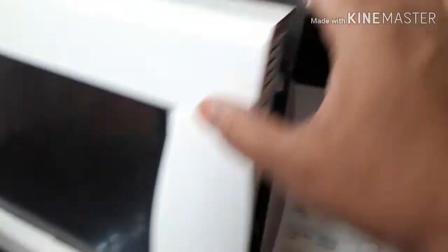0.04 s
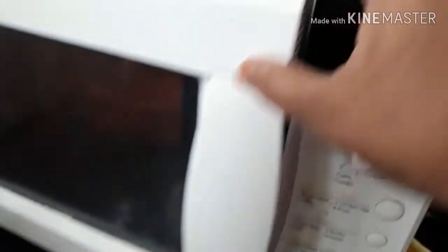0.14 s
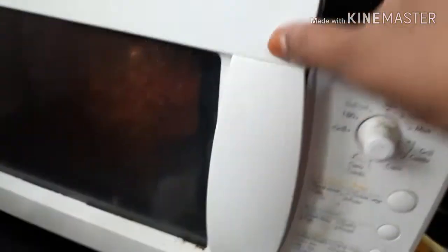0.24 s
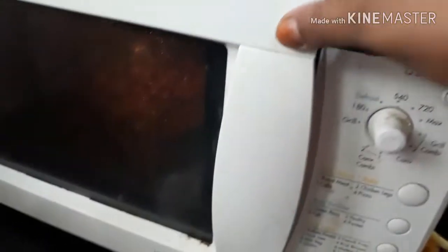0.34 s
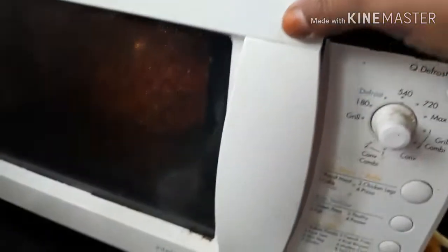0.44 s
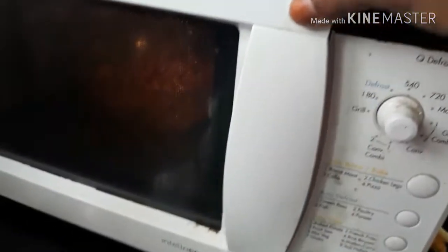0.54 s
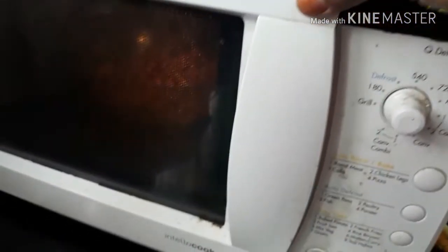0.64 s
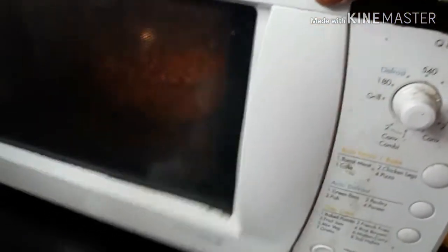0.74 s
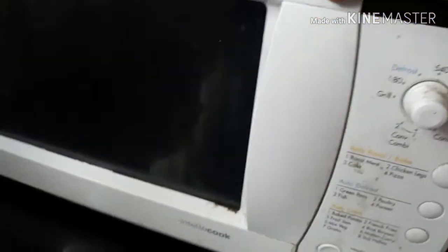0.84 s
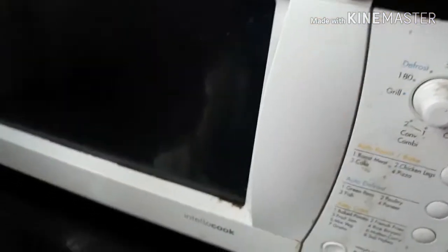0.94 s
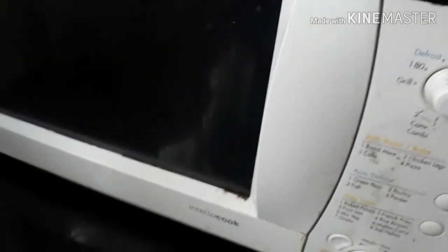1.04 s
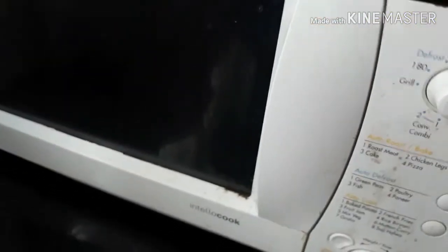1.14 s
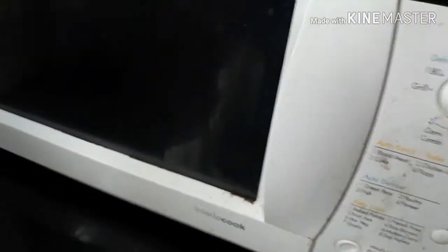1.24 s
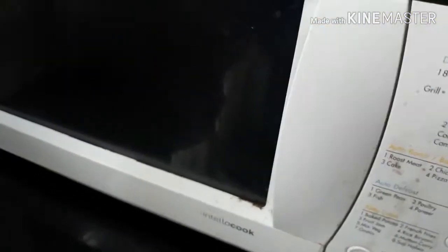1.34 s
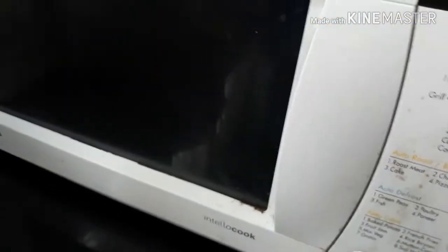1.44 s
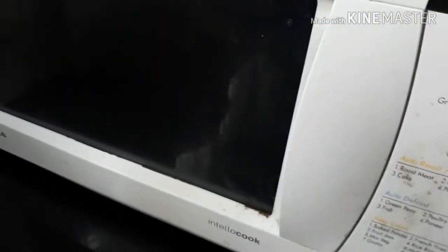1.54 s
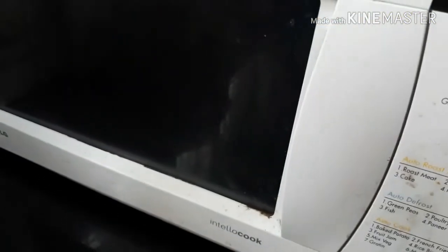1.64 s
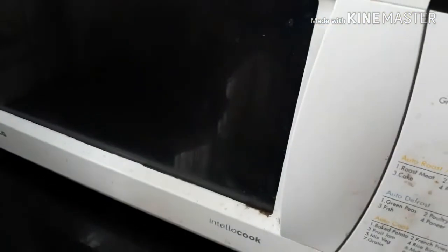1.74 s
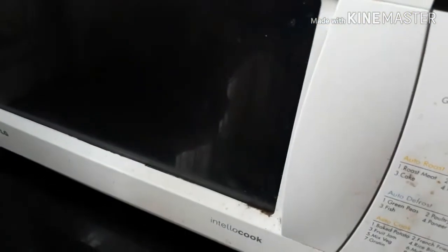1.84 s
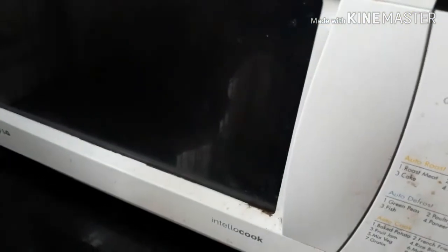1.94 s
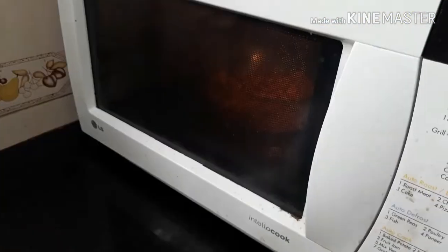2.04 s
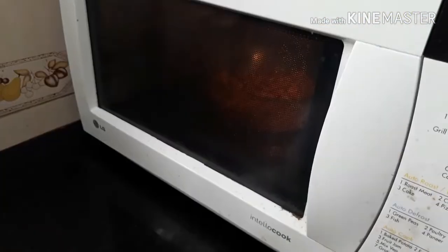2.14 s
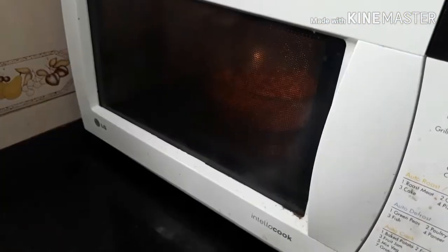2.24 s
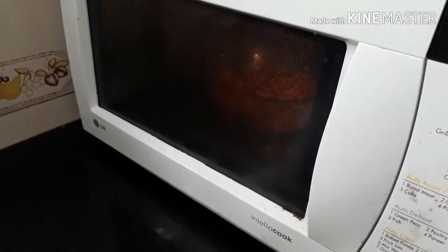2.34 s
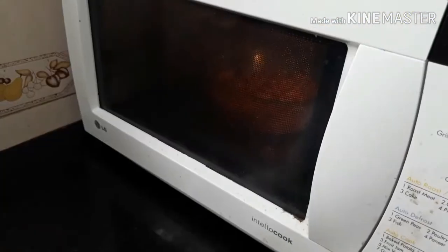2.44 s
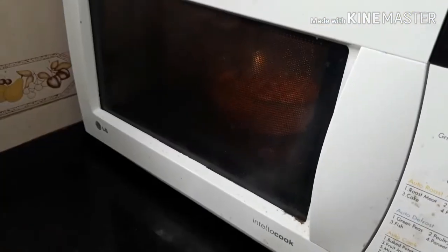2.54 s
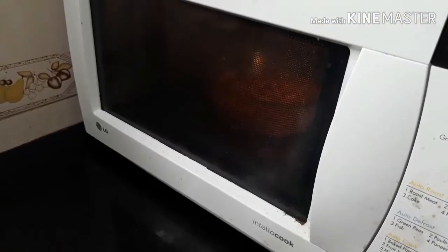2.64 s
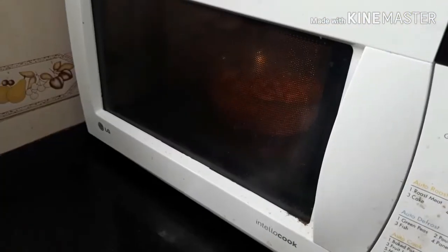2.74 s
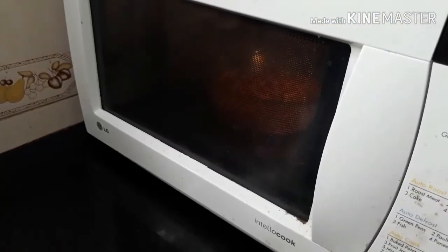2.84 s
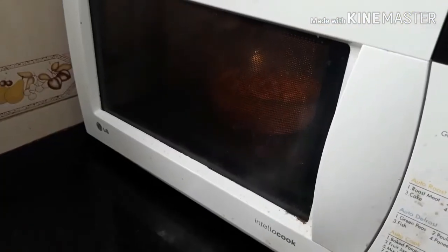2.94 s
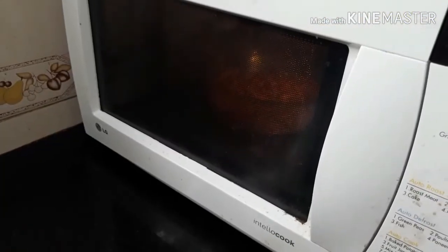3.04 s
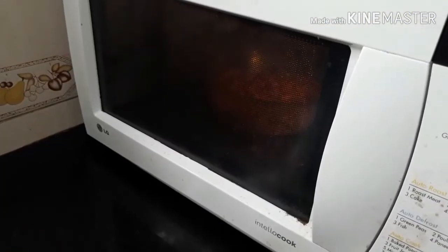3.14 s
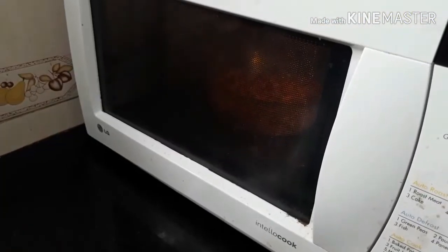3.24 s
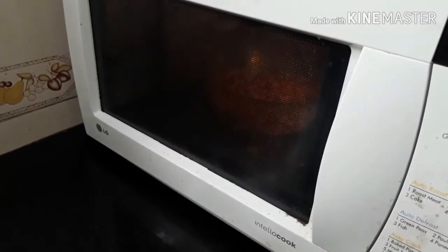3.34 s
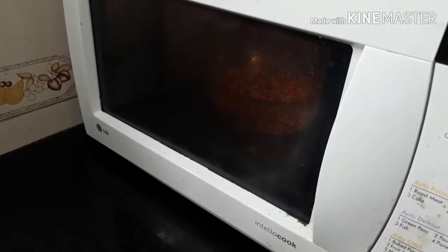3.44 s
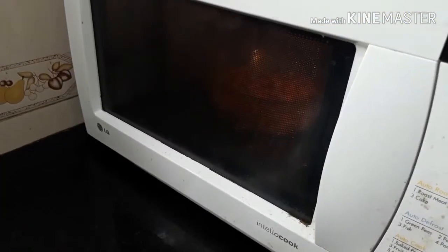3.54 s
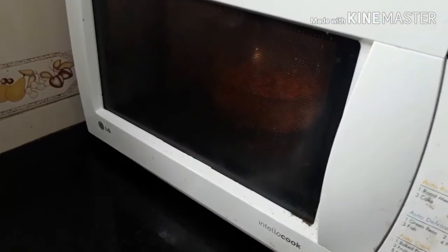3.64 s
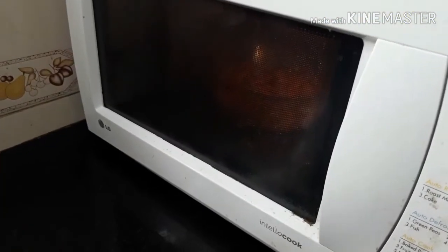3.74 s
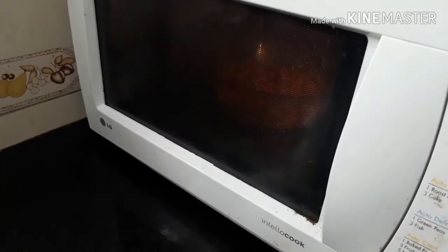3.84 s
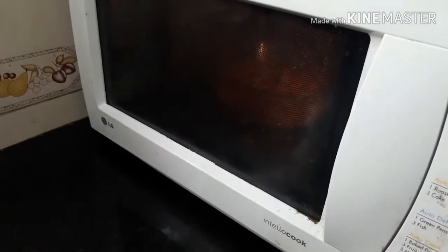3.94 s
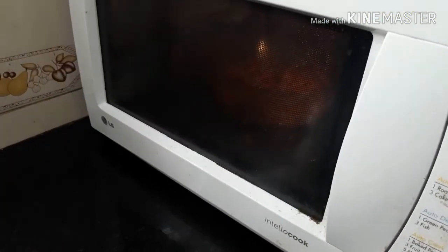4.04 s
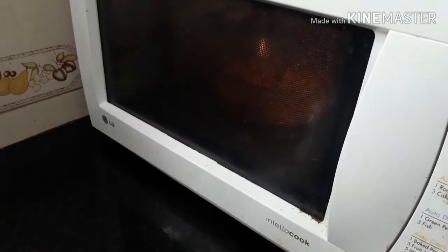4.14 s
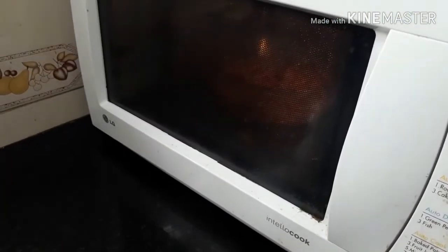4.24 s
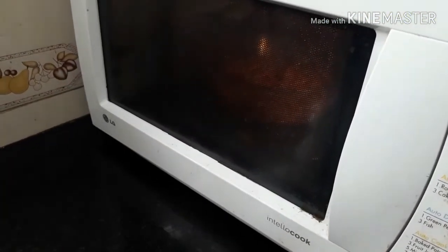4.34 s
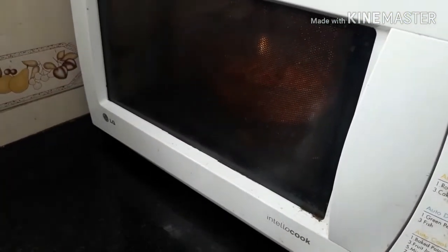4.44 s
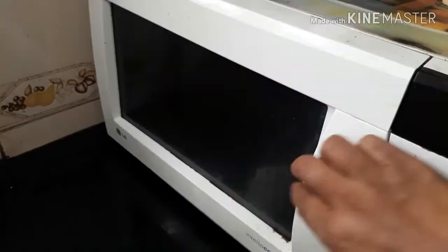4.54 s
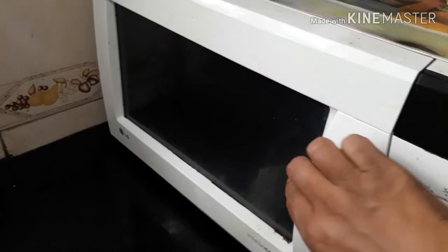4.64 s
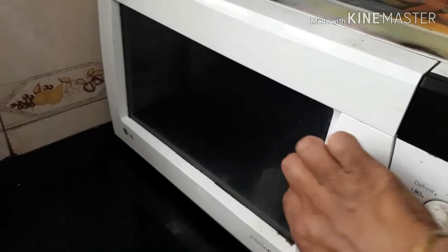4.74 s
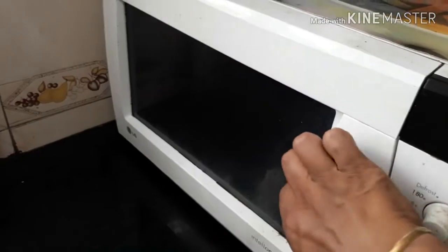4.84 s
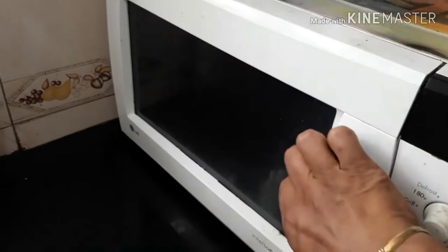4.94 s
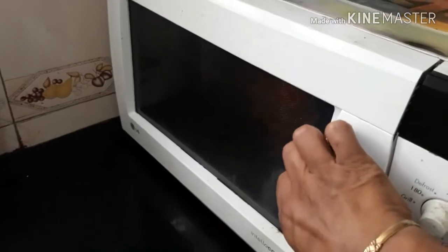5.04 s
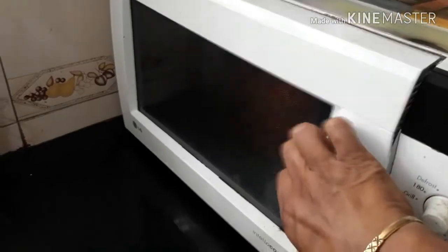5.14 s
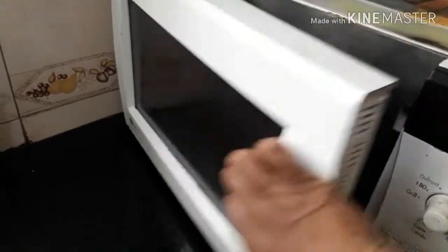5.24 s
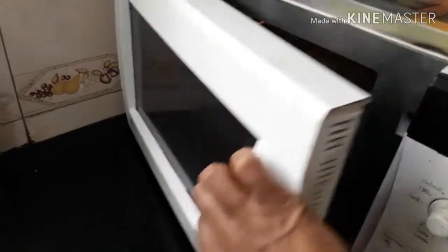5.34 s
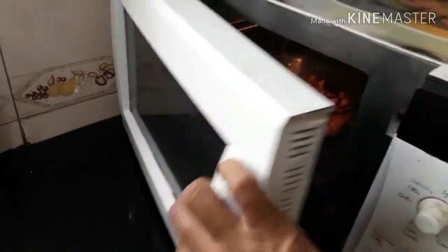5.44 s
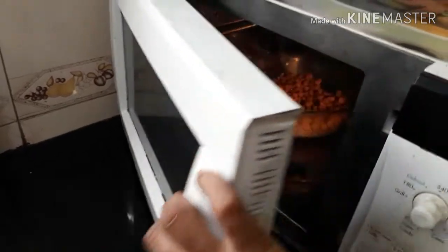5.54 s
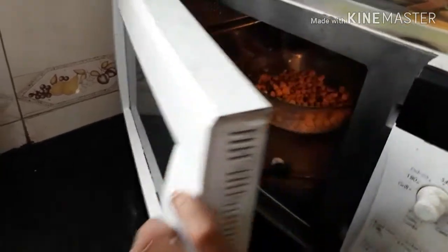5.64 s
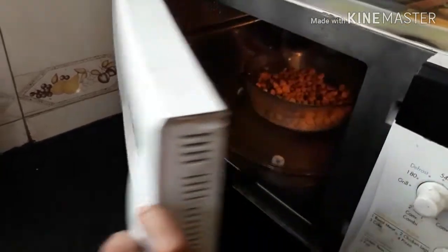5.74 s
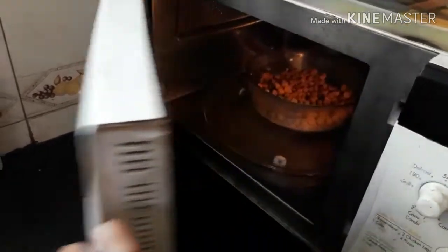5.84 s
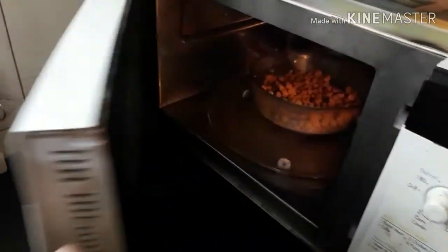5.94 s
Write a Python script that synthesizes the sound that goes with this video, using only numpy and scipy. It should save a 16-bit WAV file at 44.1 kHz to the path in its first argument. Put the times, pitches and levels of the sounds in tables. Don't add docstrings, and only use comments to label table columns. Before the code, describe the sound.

Bright latch ticks and a hollow door slam, a brief gap, a low electrical hum with fan air, then a clicking door release.

```python
import sys
import numpy as np
from scipy import signal
from scipy.fft import rfft, irfft, next_fast_len
from scipy.io import wavfile

SR = 44100
rng = np.random.default_rng(int(sys.argv[2]) if len(sys.argv) > 2 else 0)


def level_to_linear(level):
    exponent = np.asarray(level, float) / 20
    return 10 ** exponent


def wav_out(sig):
    wavfile.write(sys.argv[1], SR, np.round(np.clip(np.atleast_2d(sig).T, -1, 1) * 32767).astype(np.int16))


N = 264159


def in_time(rows):
    s, *columns = np.transpose(rows)
    return [np.interp(np.arange(N) / SR, s, c) for c in columns]


def at_hz(points, hz):
    table_hz, values = np.transpose(points)
    return np.interp(np.log(np.maximum(hz, 1)), np.log(table_hz), values)


def rms_one(x):
    return x / np.sqrt(np.mean(x ** 2) + 1e-20)


def drift(rate):
    r = np.exp(-80 * np.pi * rate / SR)
    white = rng.standard_normal(N // 40 + 2002)
    slow = signal.lfilter([1], [1, -2 * r, r * r], white)[2000:]
    return np.interp(np.arange(N) / 40, np.arange(len(slow)), rms_one(slow))


def noise(spectrum, peaks=()):
    size = next_fast_len(N)
    hz = np.arange(size // 2 + 1) * SR / size
    level_db = at_hz(spectrum, hz)
    for top_hz, width, db in peaks:
        level_db = level_db + db / (1 + ((hz - top_hz) / width) ** 2)
    return rms_one(irfft(rfft(rng.standard_normal(size)) * level_to_linear(level_db), size)[:N])


def causal(level_db):
    cepstrum = irfft(level_db * np.log(10) / 20)
    half = len(cepstrum) // 2
    folded = np.r_[cepstrum[0], 2 * cepstrum[1:half], cepstrum[half], np.zeros(half - 1)]
    pulse = irfft(np.exp(rfft(folded)))[:half]
    return pulse / np.sqrt(np.sum(pulse ** 2))


def ring(force, hz, t60):
    r, w = level_to_linear(-60 / (t60 * SR)), 2 * np.pi * hz / SR
    return signal.lfilter([0, np.sin(w)], [1, -2 * r * np.cos(w), r * r], force + 1e-18)


def rattle(t60, uneven_db, rise, size=8820):
    t = np.arange(size) / SR
    lumps_db = uneven_db * np.repeat(rng.standard_normal(size // 42), 42)
    grains = rng.standard_normal(size) * level_to_linear(lumps_db)
    return grains * level_to_linear(-60 * t / t60) * np.minimum(t / rise, 1)


def add(out, s, x):
    i = round(s * SR)
    out[i:i + len(x)] += x[:N - i]


# rumble, air, rustle and hiss in dB.
REST = [
    (-58, -60, -68.5, -78),
    (-55.5, -47, -49, -59.5),
]
# time in seconds, dB over rest.
STIR = [(0, -1.5), (.22, 4.2), (.4, 11), (.6, 2), (.72, 11), (1.2, 6), (1.6, 3.5), (1.95, 5.5), (4.7, -3.7),
        (4.9, 3), (5.1, 13.5), (5.18, 9), (5.4, 16.5), (5.63, 4.5), (5.82, 4), (5.89, 3), (5.99, 8)]
# time in seconds, hiss in dB over rest, half length in seconds.
BRUSHES = [
    (.22, 9, .1),
    (5.575, 1.5, .06),
    (5.728, 10, .07),
    (5.94, 9, 0.067),
]
# frequency in Hz, density in dB per Hz.
RUMBLE = [(30, -32.5), (60, -13.5), (85, -2), (106, 3), (135, -13.5), (200, 0.5), (300, -12), (400, -62)]
RUMBLE_OPEN = [(30, -42), (70, -6.5), (125, -7.5), (160, 0.5), (270, 0), (370, -9.5), (450, -35.5)]
AIR = [(200, -28.5), (350, 3.5), (800, -2), (1500, -5), (2500, -7.5), (3100, -13), (4000, -11),
       (4800, -24.5), (5800, -27.5)]
RUSTLE = [(3500, -8), (5000, -7), (5800, -4), (6900, -2.5), (8600, -10.5), (9300, -32.5)]
HISS = [(8000, -26.5), (9200, -4), (11000, -1.5), (13000, -14.5), (15000, -12.5), (16000, -1.5)]


def still_kitchen():
    t = np.arange(N) / SR
    rumble_db, air_db, rustle_db, hiss_db = np.array(REST).T[:, (t > 2) * 1]
    stir_db, = in_time(STIR)
    brush_db = sum(db * np.exp(-((t - s) / half) ** 2) for s, db, half in BRUSHES)
    air_db = air_db + 0.25 * stir_db + 0.14 * brush_db
    rustle_db = rustle_db + 0.1 * stir_db + 0.42 * brush_db
    rumble = level_to_linear(rumble_db + stir_db + 1.2 * drift(6)) * np.where(t < 2, noise(RUMBLE), noise(RUMBLE_OPEN))
    air = level_to_linear(air_db + 0.6 * drift(21)) * noise(AIR)
    rustle = level_to_linear(rustle_db + 1.4 * drift(12)) * noise(RUSTLE)
    hiss = level_to_linear(hiss_db + brush_db + 0.6 * drift(12)) * noise(HISS)
    return (rumble + air + rustle + hiss) * ((t < 2) | (t > 4.58))


def thumps(pushes, notes):
    out, t = np.zeros(N), np.arange(SR) / SR
    rise_cycles = 1.97
    for hz, note_db, t60 in notes:
        swell = 1 - np.exp(-t * hz / rise_cycles)
        fade = np.cos(np.pi / 2 * t) ** 2
        note = level_to_linear(note_db - 60 * t / t60) * swell * np.sin(2 * np.pi * hz * t) * fade
        for s, push_db, pitch_hz, fall_db in pushes:
            octaves_away = abs(np.log2(hz / pitch_hz))
            add(out, s, level_to_linear(push_db - fall_db * octaves_away) * note)
    return out * level_to_linear(1.5 * drift(9))


# frequency in Hz, density in dB per Hz.
CRACK = [(120, -11), (200, -9), (353, 2), (519, -5), (1530, -11.5), (1810, -14), (7270, -22.5),
         (9580, -30.5), (14600, -42), (16000, -43)]


def blows(table, modes):
    cracks, rings, hz = np.zeros(N), np.zeros(N), np.linspace(0, SR / 2, 513)
    for s, crack_db, t60, tilt_db, door_db in table:
        shake = rattle(t60, uneven_db=3.0, rise=.002)
        colour = causal(at_hz(CRACK, hz) + tilt_db * np.log2((hz + 100) / 2000))
        add(cracks, s, level_to_linear(crack_db - 2.0) * np.convolve(shake, colour))
        push = np.r_[np.hanning(24) / 12, np.zeros(SR // 2)]
        add(push, 0, level_to_linear(-24.5) * shake)
        strengths = level_to_linear(door_db - 4 + 2.5 * rng.standard_normal(len(modes)))
        strengths = strengths * rng.choice([-1, 1], len(modes))
        panel = sum(strength * level_to_linear(db) * ring(push, mode_hz, mode_t60)
                    for strength, (mode_hz, db, mode_t60) in zip(strengths, modes))
        add(rings, s, panel)
    return np.array([cracks, rings])


def bounces(chatter, t60, tilt_db, count=4):
    return [(s + k * gap, crack_db - k * loss_db, t60, tilt_db, door_db - k * loss_db)
            for s, crack_db, door_db, gap, loss_db in chatter for k in range(count)]


# start in seconds, level in dB, favoured pitch in Hz, fall in dB per octave away.
PUSH_SHUT = [
    (.03, -24.5, 76.6, 40.5),
    (.262, -18.5, 121.3, 59),
    (.264, -12, 191, 26),
    (.335, -25.5, 161, 19),
    (.45, -34.5, 120, 29),
    (.724, -30, 300, 4.5),
    (.745, -22, 199.7, 3.5),
    (.797, 1, 180, -1.8),
    (.97, -18, 166.5, 22),
    (1.438, -37, 104, 25),
]
# frequency in Hz, level in dB, t60 in seconds.
BOX_SHUT = [(80, -26, 0.53), (106.1, -6.5, 0.38), (117, -12.5, .4), (124.2, -8.5, .5), (147, -27, 0.97),
            (172, -16, 0.69), (191, -15.5, .4), (215.7, -26.5, 0.98), (247, -12.5, 0.34), (334, -9, 0.15)]
# start in seconds, crack peak in dB, rattle t60 in seconds,
# brightness in dB per octave, door ring in dB.
SHUT = [
    (.2575, -16.5, 0.075, 2, -20),
    (.53, -37.5, 0.12, 3.5, -40),
    (.7605, -26.5, 0.097, 0.5, -24.5),
    (.7875, -12.5, 0.18, 6, -41),
    (.7985, -13, 0.058, 4.5, -10),
    (.805, -15.5, .04, -7.5, -9.5),
    (.812, -12.5, 0.21, -2.5, -17.5),
]
# first bounce in seconds, crack in dB, door ring in dB, gap in seconds, loss in dB per bounce.
CHATTER_SHUT = [
    (.283, -29, -28.5, .0275, 1.5),
    (.826, -18.5, -12.5, .031, 4.5),
]
# frequency in Hz, level in dB, t60 in seconds.
DOOR_SHUT = [(348, -13, .08), (434, -3.5, 0.047), (540, -10, 0.11), (610.2, -6, 0.19), (666, -15.5, 0.088),
             (785, -16.5, 0.15), (846, -12.5, .15), (913, -12.5, 0.1), (961, -15, 0.14),
             (1056, -15.5, 0.26), (1265, -15, 0.078), (1787, -15, .04), (2230, -7, 0.054),
             (4175, -19.5, 0.1)]


def door_shuts():
    chatter = bounces(CHATTER_SHUT, t60=0.11, tilt_db=0.33)
    cracks, rings = blows(SHUT + chatter, DOOR_SHUT)
    return np.array([cracks, rings, thumps(PUSH_SHUT, BOX_SHUT)])


# start in seconds, peak in dB, lowest frequency in Hz, t60 in seconds.
TICKS = [(0.2184, -50, 5000, 0.034), (0.2559, -18, 3330, 0.045), (0.2648, -10.5, 5900, 0.035),
         (0.273, -11.5, 6100, 0.035), (0.4098, -13, 2920, 0.068), (0.449, -15.5, 3060, 0.038),
         (0.5259, -15.5, 1400, 0.03), (4.9199, -24.5, 1510, 0.019), (4.9603, -12.5, 5560, 0.0173),
         (4.9893, -11, 3700, 0.035), (5.02, -16, 4600, 0.065), (5.077, -19.5, 5200, 0.031),
         (5.1642, -10.5, 5060, 0.022), (5.1958, -17, 4940, 0.031), (5.3139, -32, 4500, 0.018),
         (5.903, -46, 3000, 0.029), (5.95, -43, 11000, .015)]
# frequency in Hz, width in Hz, level in dB.
TICK_RINGS = [(7230, 290, 6.5), (11000, 1500, -14.5), (13400, 1600, -18.5)]


def ticks():
    out, hz = np.zeros(N), np.linspace(0, SR / 2, 513)
    peaks = sum(level_to_linear(db) / np.sqrt(1 + ((hz - top_hz) / width) ** 2) for top_hz, width, db in TICK_RINGS)
    for s, peak_db, low_hz, t60 in TICKS:
        bass_loss_db = 10 * np.log10(1 + (low_hz / (hz + 50)) ** 8)
        colour = causal(20 * np.log10(0.35 + peaks) - bass_loss_db)
        burst = rattle(t60, uneven_db=1.7, rise=.001, size=2646)
        add(out, s, level_to_linear(peak_db - 6) * np.convolve(burst, colour))
    return out


# frequency in Hz, t60 in seconds.
KITCHEN_T60 = [(60, 1), (250, 1), (500, 0.81), (1000, 0.47), (4000, 0.4), (10000, 0.31), (16000, 0.11)]
# frequency in Hz, level in dB.
ECHO_COLOUR = [(60, -1.5), (150, 1), (400, -7), (1000, 2.5), (5000, 1), (7000, 2), (8700, 1), (9500, -4),
               (16000, 5)]


def kitchen(x):
    t, edges, echo = np.arange(SR) / SR, 45 * 2 ** np.arange(0, 9, .5), 0
    for low, high in zip(edges, edges[1:]):
        half_octave = signal.butter(2, [low, high], "band", fs=SR, output="sos")
        band = signal.sosfilt(half_octave, rng.standard_normal(SR))
        echo = echo + band * level_to_linear(-60 * t / at_hz(KITCHEN_T60, np.sqrt(low * high)))
    onset = np.clip((t - .003) / 0.0013, 0, 1)
    echo = np.convolve(echo * onset, causal(at_hz(ECHO_COLOUR, np.linspace(0, SR / 2, 1025))))
    return signal.fftconvolve(x, echo / np.sqrt(np.sum(echo ** 2)))[:N]


# frequency in Hz, level in dB, t60 in seconds.
SPRINGS = [(1480, -64, 1.2), (1577, -61, 5.0), (4264, -62, 1.1), (4538, -63, 1.3), (4678, -62, 1.3)]


def springs():
    force, start_s = np.zeros(N), 0.99
    force[round(start_s * SR)] = 1
    return sum(level_to_linear(db + 1.07 * drift(5.8)) * ring(force, hz, t60) for hz, db, t60 in SPRINGS)


TONE_HZ = [99.9, 199.8, 173.3, 216, 243.2, 260, 346.4, 388.8, 563, 692.9, 879, 1097, 1198.5]
# level in dB under the oven's, waver in dB.
TONES = [(-4, 1.5), (-5.5, 1), (-14.5, -0.5), (-20.5, 3.5), (-13.5, 2), (-20.5, 5), (-8.5, 2.5), (-20, 3.5),
         (-22, -1), (-17, -4), (-24, 3), (-25.5, 0.5), (-26, 1)]
# frequency in Hz, density in dB per Hz.
FAN = [(25, -2), (60, -4), (80, -30), (130, 2.5), (280, -1), (470, -4), (560, -2), (920, -0.5), (980, -9.5),
       (1090, -9), (1200, -6), (2600, -13.5), (3200, -16.5), (7090, -20.5), (8600, -25.5), (9600, -34.5),
       (15500, -38.5)]
# frequency in Hz, width in Hz, lift in dB.
DUCT = [(312, 12, 5), (620, 22, 1), (746, 20, 5), (880, 11, -0.5), (1055, 12, 5), (1064, 13, 7.5),
        (1180, 7.5, 0), (1294, 5.6, 8), (1230, 30, -9.5), (2020, 330, 3)]


def oven():
    t = np.arange(N) / SR
    tones = 0
    for hz, (db, waver_db) in zip(TONE_HZ, TONES):
        phase = rng.uniform(0, 2 * np.pi) + 0.35 * waver_db * drift(1.02)
        tones = tones + level_to_linear(db + 4.0 + waver_db * drift(6.1)) * np.sin(2 * np.pi * hz * t + phase)
    air = level_to_linear(-4.5 + 0.5 * drift(15)) * noise(FAN, DUCT)
    run_db, short_db, settle_s = -38, 5, 0.23
    since_start = np.abs(t - TAKES[1][0])
    level = level_to_linear(run_db - short_db * np.exp(-since_start / settle_s))
    return level * (tones + air) * ((t > 2) & (t < 4.58))


# start in seconds, crack peak in dB, rattle t60 in seconds,
# brightness in dB per octave, door ring in dB.
OPEN = [
    (4.92, -35, 0.15, 3.5, -57),
    (4.991, -30.5, 0.12, 1.5, -41.5),
    (5.03, -30.5, 0.2, 3.5, -35),
    (5.048, -30, 0.084, 5, -48),
    (5.206, -27, 0.074, 2.5, -32),
    (5.2195, -17.5, 0.17, 7.5, -21),
]
# first bounce in seconds, crack in dB, door ring in dB, gap in seconds, loss in dB per bounce.
CHATTER_OPEN = [
    (5.242, -16, -20, .023, 4.5),
]
# frequency in Hz, level in dB, t60 in seconds.
DOOR_FREE = [(478, -15, 0.25), (584, -7, 0.17), (700, -10.5, 0.078), (787, -11, .12), (936, 0, 0.048),
             (1174, -3.5, 0.1), (1350, -11, 0.2), (1640, -11, 0.075), (2010, -5.5, 0.037)]
# start in seconds, level in dB, favoured pitch in Hz, fall in dB per octave away.
PUSH_FREE = [
    (4.9, -35, 108, 73),
    (4.99, -33, 145, 17),
    (5.02, -30, 125, 4.1),
    (5.22, -19.5, 394, 4.6),
    (5.29, -22, 164, 67),
]
# frequency in Hz, level in dB, t60 in seconds.
BOX_FREE = [(108, -5.5, 0.81), (123.4, -9, 0.56), (131.8, 3.5, 0.28), (152.2, -2.5, 0.81),
            (164, -10.5, 1.2), (242, -21, 0.19), (356, 5.5, 0.34), (817, -2.5, 0.34), (1156, 5, 0.13)]


def door_opens():
    chatter = bounces(CHATTER_OPEN, t60=.15, tilt_db=2.87)
    cracks, rings = blows(OPEN + chatter, DOOR_FREE)
    return np.array([cracks, rings, thumps(PUSH_FREE, BOX_FREE)])


# start and end in seconds, fade-in in seconds, fade start in dB, cut in seconds.
TAKES = [
    (-1, 1.938, .1, 0, .003),
    (2.068, 4.5635, .015, -30, .0002),
    (4.6, 7, .11, -32, .001),
]


def scene_changes():
    t, gain = np.arange(N) / SR, 0
    for start, end, fade, from_db, cut in TAKES:
        rise = np.clip((t - start) / fade, 0, 1) ** 2.3
        fall = np.clip(1 - (t - end) / cut, 0, 1)
        gain = gain + level_to_linear(from_db * (1 - rise)) * (t > start) * fall
    return gain


def scene():
    room_tone = still_kitchen()
    cracks, rings, low = door_shuts() + door_opens()
    near = ticks()
    echo = kitchen(level_to_linear(-9.5) * near + level_to_linear(-7) * cracks + level_to_linear(-14.5) * rings + level_to_linear(-18.5) * low)
    return (near + cracks + rings + low + springs() + echo + oven() + room_tone)[None]


def low_pass(x):
    return signal.sosfilt(signal.butter(12, 16650, fs=SR, output="sos"), x)


def record(dry):
    ceiling, top_hz, offset_db = 1.1, 15620, -66
    x = signal.sosfilt(signal.butter(4, 65, "high", fs=SR, output="sos"), dry)
    x = ceiling * np.tanh(x / ceiling)
    x = signal.sosfilt(signal.cheby2(16, 30, top_hz, fs=SR, output="sos"), x)
    x = (x - level_to_linear(offset_db)) * scene_changes()
    return low_pass(x)


dry = scene()
out = record(dry)
wav_out(out)
```